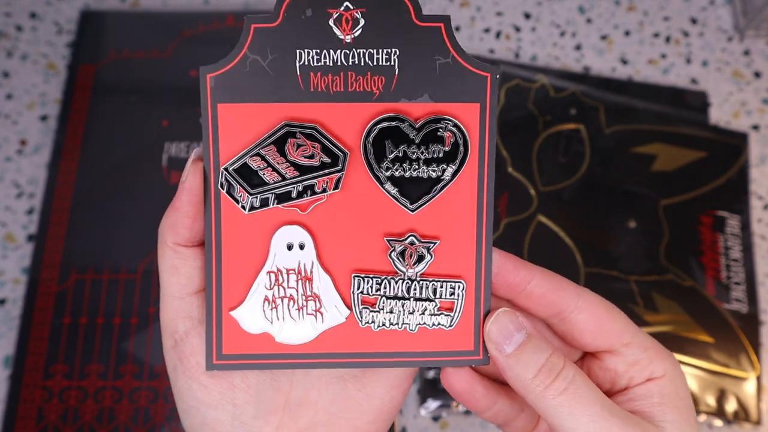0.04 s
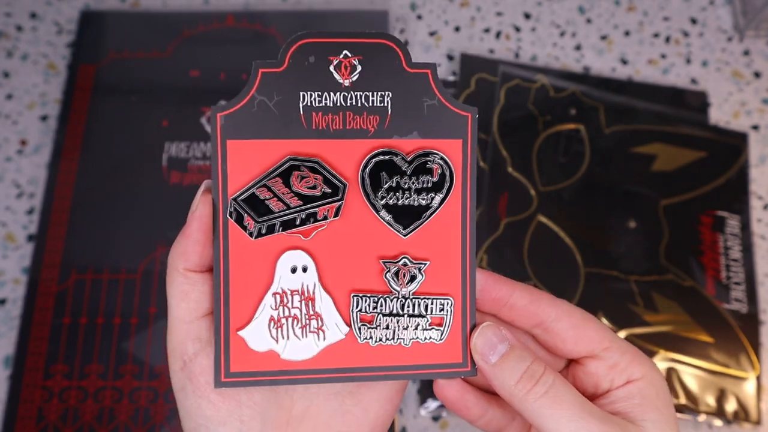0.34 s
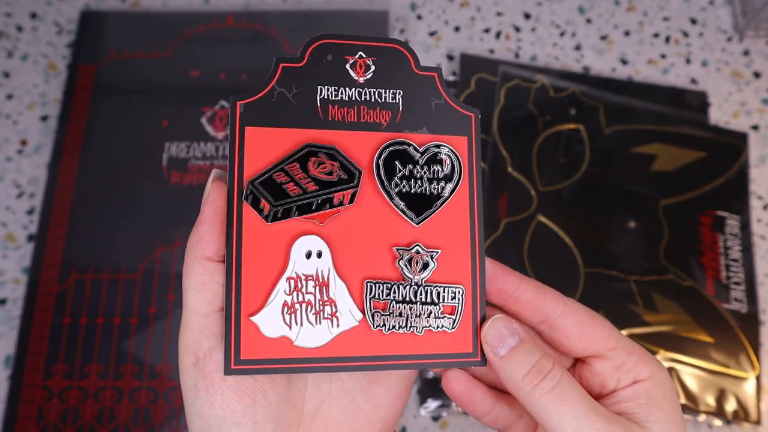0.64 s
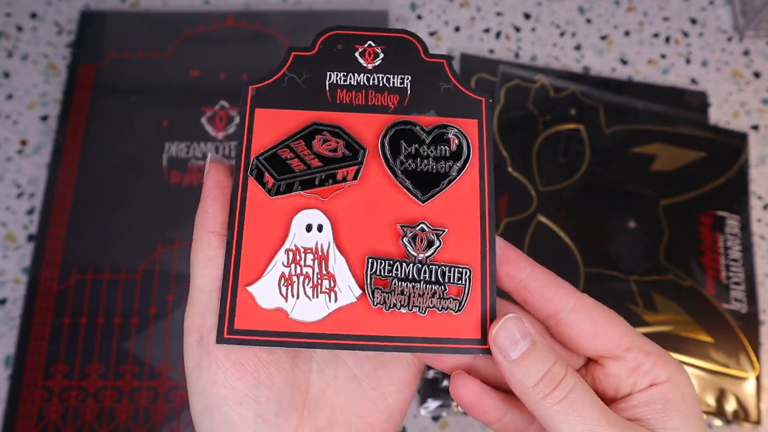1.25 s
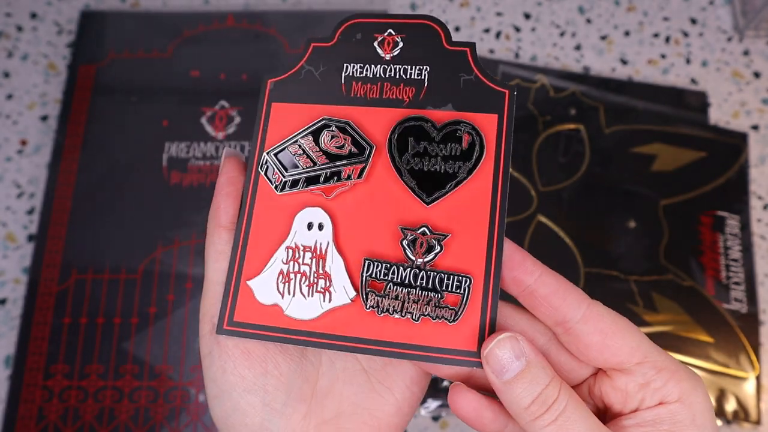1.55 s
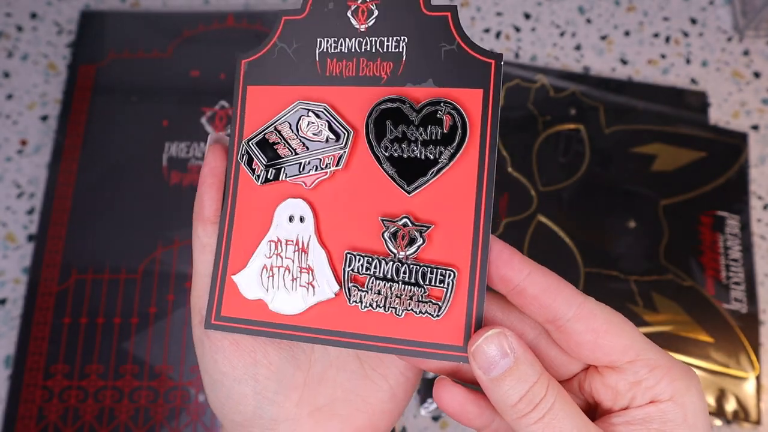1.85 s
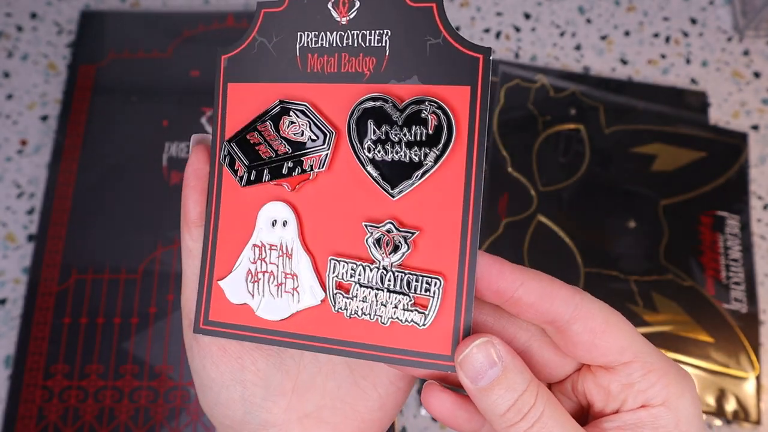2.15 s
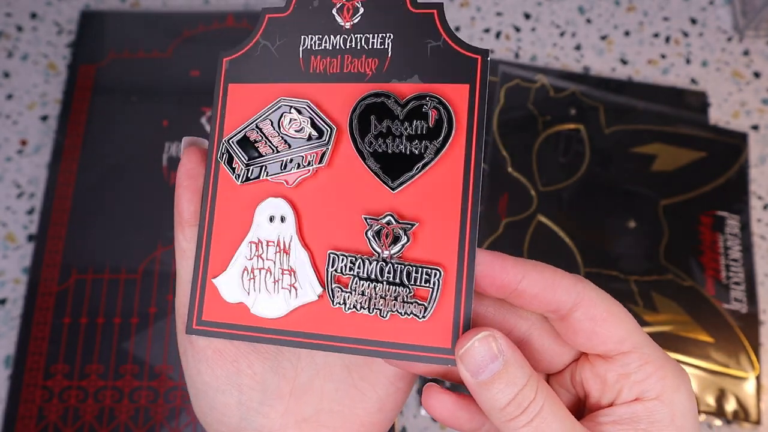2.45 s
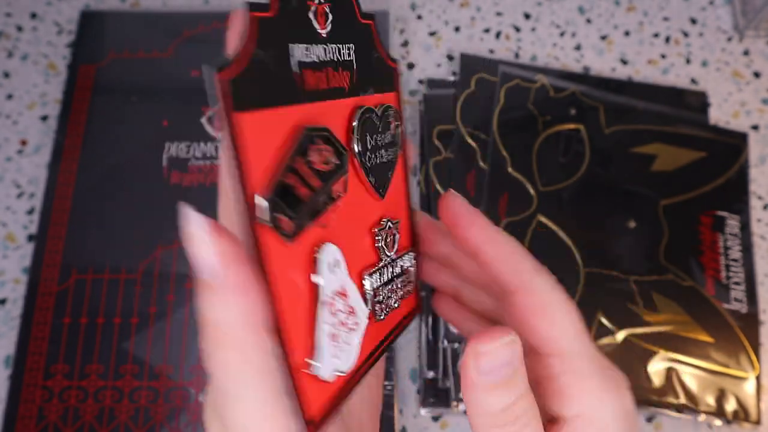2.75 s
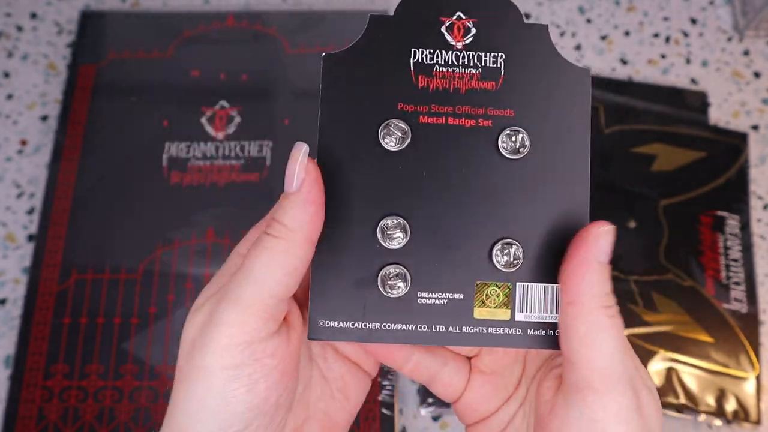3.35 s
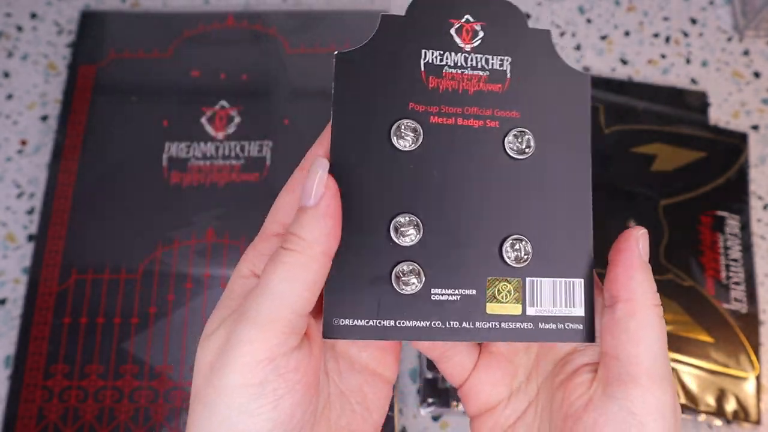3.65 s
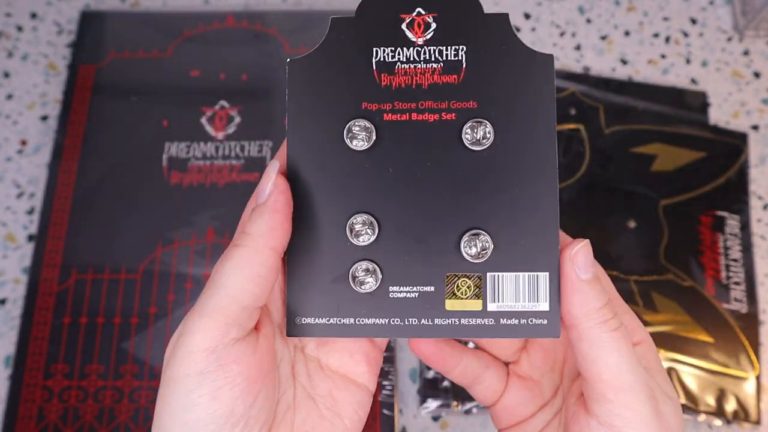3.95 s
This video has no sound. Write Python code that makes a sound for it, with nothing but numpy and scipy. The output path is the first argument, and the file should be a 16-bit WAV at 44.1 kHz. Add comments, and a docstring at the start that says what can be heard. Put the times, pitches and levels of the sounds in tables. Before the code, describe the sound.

A stiff card with metal pins is flipped by hand, ticking and clattering briefly.

```python
"""A stiff card with metal pin badges is tilted, then flipped by hand above a desk in a quiet room.
Nails tick on the card and it slaps into the other hand, each hit ringing the card's resonances.
The pin clasps rattle and chink in high metal modes. Fingers slide with a grainy rub, the card's
edge scrapes in tiny slips and a fingertip squeaks once.
Behind it sits a bed of ventilation noise, mains hum and a soft low throb."""
import sys
import numpy as np
from scipy import signal
from scipy.fft import rfft, irfft
from scipy.io import wavfile
from scipy.ndimage import uniform_filter1d

SR = 44100
rng = np.random.default_rng(int(sys.argv[2]) if len(sys.argv) > 2 else 0)


def file_out(sig):
    """Save sig as 16-bit WAV at sys.argv[1]."""
    # one column per channel
    cols = np.atleast_2d(sig).T
    # limit, then scale
    lim = np.clip(cols, -1, 1)
    pcm = np.round(lim * 32767).astype(np.int16)
    wavfile.write(sys.argv[1], SR, pcm)


N = 176400
TIME = np.arange(N) / SR

# the four registers of a tap, in the order thud, body, clack, tick: (low edge [Hz], high edge [Hz])
TAP_REGISTERS = [(290, 480), (560, 1025), (1600, 4460), (5100, 11400)]
# stereo image of each register: (left-right correlation [-1..1])
TAP_IMAGE = [0.97, 0.96, 0.25, -0.35]
# a nail ticks on the held card:
# (time [s], thud [dB], body [dB], clack [dB], tick [dB], clack and tick t60 [s], grip pitch [ratio])
NAIL_HITS = [(.7233, -66, -55, -46, -55, 0.047, 0.95), (1.0111, -35, -33, -30.5, -40, 0.025, 1),
             (1.0545, -47, -35.5, -32.5, -38, 0.045, 1), (1.329, -62, -62, -41, -41.5, 0.019, 0.94),
             (2.586, -66, -63, -52, -51.5, .05, 0.93), (3.442, -62, -58, -36, -57, 0.024, 0.83),
             (3.4937, -24.5, -23.5, -20.5, -26, 0.017, .98), (3.4968, -32, -36, -27.5, -28.5, 0.027, 0.96)]
# the turning card knocks against the hands: columns as in NAIL_HITS
HAND_HITS = [(2.7121, -26, -24.5, -22.5, -21, .014, 0.77), (2.716, -28.5, -32, -33, -31, 0.023, 0.82),
             (2.7245, -33, -45, -33, -33, 0.022, .81), (2.9583, -46, -50, -42, -46, 0.054, 1),
             (2.9758, -30, -31, -18, -28, 0.036, 1.1), (2.9795, -23, -19, -12, -22, 0.017, 1),
             (2.9815, -22, -12, -11, -22, 0.023, 1), (2.9855, -20, -21, -19, -25.5, 0.047, 1.02),
             (3.005, -26.5, -26, -16.5, -41, 0.044, 1), (3.008, -24.5, -28, -25, -27.5, 0.05, 1),
             (3.0118, -23.5, -25, -17, -34, 0.022, 1), (3.0185, -36, -37, -26, -36, 0.042, 1),
             (3.042, -35, -35, -30, -25, 0.047, .97), (3.065, -36, -42, -31, -52, 0.03, 1)]
# resonances and hollows of the card held still: (frequency [Hz], width [Hz], lift [dB])
HELD_RESONANCES = [(332, 43, 12), (440, 46, 12), (690, 80, 14), (850, 50, 5), (1220, 60, 8), (1500, 70, 11),
                   (1740, 70, 8), (2570, 130, 20), (3300, 150, 6), (5500, 800, 5), (6850, 280, 3),
                   (9600, 600, 5), (12200, 1800, -5)]
# resonances and hollows of the loose card: (frequency [Hz], width [Hz], lift [dB])
LOOSE_RESONANCES = [(165, 30, 19), (326, 32, 13), (545, 70, -8), (645, 40, 17), (792, 30, 8), (948, 30, 3),
                    (1130, 80, 8), (1380, 220, -2), (1732, 30, 10), (1784, 30, 12), (2038, 50, 7),
                    (2305, 38, 5), (2640, 70, 9), (2860, 50, 8), (3300, 50, 6), (3408, 50, 7),
                    (3750, 60, 3), (4150, 250, -8), (4705, 60, 7)]
# a clasp rattles on its pin: (time [s], level [dB], tilt [dB/octave], ring the fingers leave [0..1])
CLASP_HITS = [(2.863, -48.5, -12, 0.9), (2.919, -54, 2, .6), (2.9756, -26, -7, .35),
              (2.9969, -22, -2.5, 0.66), (3.0173, -24.5, -6, 0.53), (3.036, -22.5, 4, .48),
              (3.0425, -24.5, 7, .45)]
# metal modes of the clasps: (frequency [Hz], relative level [dB], undamped t60 [s])
CLASP_MODES = [(3931, -11, .09), (5185, -10, .04), (5270, 0, .08), (5450, -10, .04), (9280, -9, .045),
               (9872, -5, .05), (11050, -8, .04), (11700, -6, .04), (11890, -7, .04), (12088, -1, .06),
               (12350, -6, .04), (12750, -8, .04), (13400, -14, .03)]
# skin slides over the card: (peak time [s], rise [s], fall [s], level [dB], hiss trim [dB])
FINGER_STROKES = [(.625, 0.015, 0.033, -50.5, -10), (2.684, 0.0078, 0.003, -41, 7),
                  (2.72, 0.062, 0.03, -44, 0), (2.775, 0.048, 0.022, -47, -12),
                  (2.922, 0.0036, 0.0076, -40, 2), (2.972, 0.013, 0.03, -33, -9),
                  (3.07, 0.068, 0.026, -44, 0), (3.128, 0.025, 0.012, -45.5, 4.5),
                  (3.385, 0.0064, 0.013, -50.5, -10), (3.44, 0.017, 0.034, -48, 4),
                  (3.488, 0.01, 0.022, -42.5, -3), (3.545, .03, 0.074, -58, -1),
                  (3.705, 0.045, 0.087, -49, -10), (3.715, 0.0015, 0.002, -39, -17),
                  (3.887, 0.004, 0.01, -42, -17), (3.901, 0.012, 0.12, -51.5, -21)]
# colour of the skin's rub: (frequency [Hz], relative level [dB])
RUB_SPECTRUM = [(200, 1.5), (500, 3.5), (1300, -7.5), (2600, 1), (5000, -11), (12000, -21)]
# colour of the skin's hiss: (frequency [Hz], relative level [dB])
HISS_SPECTRUM = [(3000, -4), (5200, -6), (7300, 6.5), (8500, 0), (9500, 5), (11500, 4), (12500, 0),
                 (14500, -18)]
# stereo image of the slides: (frequency [Hz], left-right correlation [-1..1])
SLIDE_IMAGE = [(200, 0.99), (700, 0.89), (2000, 0.21), (4000, 0.21), (8000, -0.31), (13000, -0.62)]
# the card's edge catches: (peak time [s], half length [s], resonance [Hz], level [dB])
EDGE_CATCHES = [(2.683, 0.0056, 2600, -45), (2.686, 0.0031, 7000, -37), (2.75, 0.027, 2700, -49),
                (2.76, .022, 7250, -54), (2.778, .014, 4000, -50.5), (2.925, 0.0052, 3830, -44),
                (2.998, 0.0029, 3350, -25), (3.021, 0.0065, 4700, -32), (3.117, 0.016, 4570, -47.5),
                (3.688, .018, 2440, -51.5)]
# colour of the ventilation and microphone hiss: (frequency [Hz], relative level [dB])
AIR_SPECTRUM = [(15, -45), (25, -25), (36, -12), (52, -0.5), (73, -3), (100, -3.5), (145, -10),
                (215, -15.5), (310, -14.5), (385, -18), (420, -15.5), (490, -13), (545, -18.5),
                (650, -10.5), (710, -17.5), (800, -19), (850, -17), (1010, -14), (1100, -21), (1320, -22.5),
                (1600, -21.5), (2500, -25.5), (4500, -33.5), (8200, -38), (9000, -43.5), (11500, -44.5),
                (14000, -58)]
# stereo image of the ventilation: (frequency [Hz], left-right correlation [-1..1])
AIR_IMAGE = [(80, 1), (160, 0.88), (280, 0.34), (490, 0.4), (555, 0.23), (650, 0.58), (740, 0.58),
             (1000, 0.29), (1120, 0.074), (2000, -0.25), (3300, -0.55), (12000, -0.66)]
# tones of the hum: (frequency [Hz], level [dB])
HUM_TONES = [(77, -48.5), (119.8, -43), (179.5, -55), (360, -62.5), (419.7, -58.5), (479.5, -65.5),
             (839.6, -60.5)]
# swells of the low throb: (peak time [s], level [dB])
THROB_SWELLS = [(0.231, -36.5), (.61, -34), (.99, -35.5), (1.381, -38.5), (1.779, -36.5), (2.117, -34),
                (2.371, -36), (2.6, -38), (3.311, -34.5), (3.868, -35.5)]


def card_taps(hits, resonances, spike):
    """Each tap is a spike and a short crunch that ring the card; the grip shifts its resonances."""
    out = np.zeros((2, N))
    low_linger, low_spike = 1.2, 0.66  # thud and body ring longer and have their own attack
    for start, *levels_db, t60, pitch in hits:
        gripped = [(hz * pitch, width_hz, lift_db) for hz, width_hz, lift_db in resonances]
        contacts = [(t60 * low_linger, low_spike)] * 2 + [(t60, spike)] * 2
        for band, db, image, (decay_s, attack) in zip(TAP_REGISTERS, levels_db, TAP_IMAGE, contacts):
            push = crunch(decay_s)
            push[0, 0] += attack
            bandpass = signal.butter(3, band, "band", fs=SR, output="sos")
            mid, side = card_body(signal.sosfilt(bandpass, push + 1e-18), gripped)
            side = side - mid * (side @ mid) / (mid @ mid)  # decorrelate side from mid
            ring = [mid / np.linalg.norm(mid), side / np.linalg.norm(side)]
            gain = from_db(db) * np.sqrt(decay_s * SR / np.log(1e6))  # longer taps carry more energy
            add(out, start, stereo(ring, image) * gain)
    return out


def card_body(x, resonances):
    """The card colours a contact with one peak or hollow after another."""
    for hz, width_hz, lift_db in resonances:
        poles = resonator_poles(hz, width_hz)
        zeros = np.array([1, 0, -1]) * (1 - poles[2]) / 2  # unity gain at the peak
        x = x + (from_db(lift_db) - 1) * signal.lfilter(zeros, poles, x)
    return x


def clasp_chinks():
    """A brief dry rattle sets the clasps' small metal modes ringing, damped by the fingers."""
    out, t = np.zeros((2, N)), TIME[:SR // 3]
    highpass = signal.butter(2, 8500, "high", fs=SR, output="sos")
    ear_phase = np.array([[2.12], [0]])  # radians: left and right ring out of step
    for start, db, tilt_db, ring_share in CLASP_HITS:
        rattle = crunch(t60=0.029)
        clicks = signal.sosfilt(highpass, rattle + 1e-18)
        add(out, start, clicks / np.abs(clicks).max() * from_db(db - 13))  # bare contacts, tucked under
        for hz, mode_db, t60 in CLASP_MODES:
            mode = np.sin(2 * np.pi * hz * t + ear_phase) * from_db(-60 * t / (t60 * ring_share))
            ring = signal.fftconvolve(rattle[:1], mode, axes=1)[:, :len(t)]
            peak = from_db(db + mode_db + tilt_db * np.log2(hz / 10000))
            add(out, start, ring / np.abs(ring).max() * peak)
    return out


def finger_slides():
    """Grainy friction, a rub with a hiss on top, swells and fades under each finger stroke."""
    grain_db, hiss_db = 2, -4.5
    rub, hiss = 0, 0
    for peak_s, rise, fall, db, trim_db in FINGER_STROKES:
        progress = (TIME - peak_s) / np.where(TIME < peak_s, rise, fall)
        stroke = from_db(db) / np.cosh(np.clip(progress, -20, 20)) ** 1.75
        rub += stroke
        hiss += stroke * from_db(trim_db + hiss_db)
    roughness = unit_rms(uniform_filter1d(rng.standard_normal(N), size=60))
    grain = unit_rms(from_db(grain_db * roughness))
    return grain * (rub * noise(RUB_SPECTRUM, SLIDE_IMAGE) + hiss * noise(HISS_SPECTRUM, SLIDE_IMAGE))


def edge_scrapes():
    """The edge catches: each uneven run of tiny slips rings one resonance of the card."""
    out = np.zeros((2, N))
    slips_per_s, spread_db = 1700, 2
    for peak_s, half_length, hz, db in EDGE_CATCHES:
        slipping = rng.random(N) < slips_per_s / SR
        strength = from_db(spread_db * np.minimum(rng.exponential(1, N), 4))
        slips = slipping * strength * rng.choice([-1, 1], (2, N))
        ring = signal.lfilter([1, 0, -1], resonator_poles(hz, width_hz=410), slips + 1e-18)
        out += from_db(db) * swell(peak_s, half_length) * unit_rms(ring)
    return out


def fingertip_squeak():
    """One tiny stick-slip pip, right of centre."""
    pip = from_db(-29.5) * swell(peak_s=3.74, half_length=0.00073) * np.sin(2 * np.pi * 2340 * TIME)
    return pip * from_db([[-2], [2]])


def room_tail(x):
    """The room answers with a faint, short diffuse tail."""
    return from_db(-15.5) * signal.fftconvolve(x, crunch(t60=0.15), axes=1)[:, :N]


def room_tone():
    """Steady ventilation noise and mains hum, with a low throb whose pitch differs on each swell."""
    hum = sum(from_db(db) * np.sin(2 * np.pi * (hz * TIME + rng.random())) for hz, db in HUM_TONES)
    throb = 0
    for peak_s, db in THROB_SWELLS:
        hz = 60.6 * (1 + 0.045 * rng.normal())
        tone = np.sin(2 * np.pi * (hz * (TIME - peak_s) + rng.random()))
        throb += from_db(db) * swell(peak_s, half_length=0.026) * tone
    ventilation = from_db(-41) * noise(AIR_SPECTRUM, AIR_IMAGE)
    return ventilation + np.sqrt(2) * (hum + throb)  # sine levels are rms


def crunch(t60):
    """Two runs of dying micro-contacts, each of unit energy and even in colour."""
    t = TIME[:SR // 3]
    fade = from_db(-60 * t / t60)
    x = rng.standard_normal((2, len(t))) * fade
    for _ in range(2):  # flatten the spectrum, then fade the tail again
        spectrum = rfft(x)
        x = irfft(spectrum / (np.abs(spectrum) + 1e-12), len(t)) * np.minimum(1, 10 * fade)
    return x / np.sqrt(np.sum(x ** 2, axis=1, keepdims=True))


def noise(spectrum, image):
    """Steady coloured stereo noise, rms 1."""
    hz = np.arange(N // 2 + 1) * SR / N
    white = stereo(rfft(rng.standard_normal((2, N))), at_hz(image, hz))
    return unit_rms(irfft(white * from_db(at_hz(spectrum, hz)), N))


def stereo(pair, correlation):
    """Mix two unrelated signals as mid and side to a given left-right correlation."""
    correlation = np.clip(correlation, -.999, .999)
    mid, side = np.sqrt(1 + correlation) * pair[0], np.sqrt(1 - correlation) * pair[1]
    return np.array([mid + side, mid - side]) / np.sqrt(2)


def resonator_poles(hz, width_hz):
    """Feedback coefficients of one damped resonance."""
    radius = np.exp(-np.pi * width_hz / SR)
    return [1, -2 * radius * np.cos(2 * np.pi * hz / SR), radius * radius]


def swell(peak_s, half_length):
    """A bell-shaped envelope."""
    return np.exp(-.5 * ((TIME - peak_s) / half_length) ** 2)


def at_hz(points, hz):
    """Read a curve on a log-frequency axis."""
    frequencies, values = np.transpose(points)
    return np.interp(np.log(hz + 1e-9), np.log(frequencies), values)


def from_db(db):
    """Decibels to gain."""
    return 10 ** (np.asarray(db) / 20)


def unit_rms(x):
    """Scale to rms 1."""
    return x / np.sqrt(np.mean(x ** 2) + 1e-20)


def add(out, start_s, sound):
    """Mix a stereo sound in at its cue."""
    i = int(start_s * SR)
    out[:, i:i + sound.shape[1]] += sound[:, :N - i]


def scene():
    """The handled card up front, its short room tail and the room tone behind."""
    ticks = card_taps(NAIL_HITS, HELD_RESONANCES, spike=0.88) * from_db([[-.9], [.9]])  # a touch right
    knocks = card_taps(HAND_HITS, LOOSE_RESONANCES, spike=0.48)
    handling = ticks + knocks + clasp_chinks() + finger_slides() + edge_scrapes() + fingertip_squeak()
    return handling + room_tail(handling) + room_tone()


def record(dry):
    """A steep low-pass takes off the very top."""
    return signal.sosfiltfilt(signal.butter(12, 14500, fs=SR, output="sos"), dry)


dry = scene()
out = record(dry)
file_out(out)
```